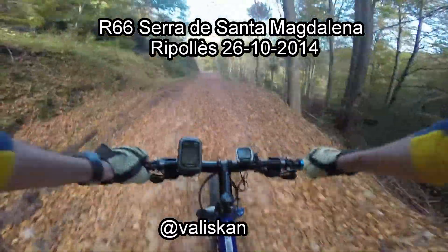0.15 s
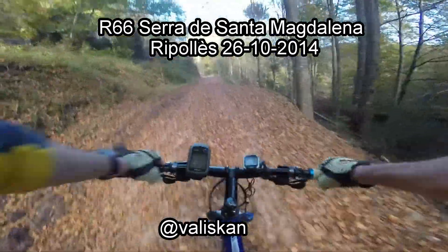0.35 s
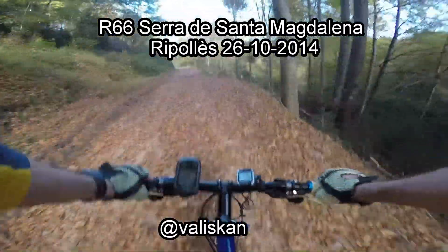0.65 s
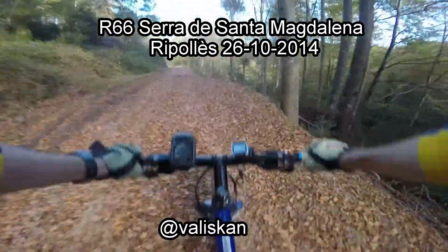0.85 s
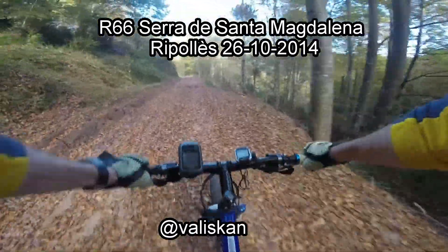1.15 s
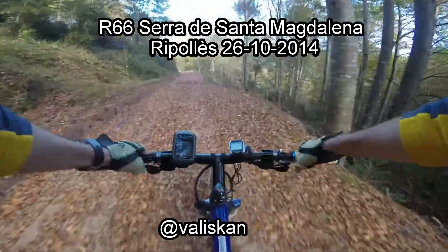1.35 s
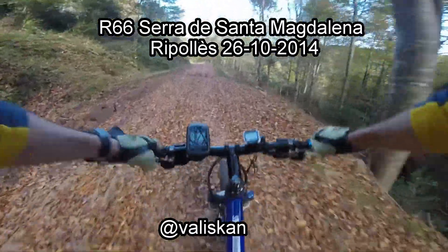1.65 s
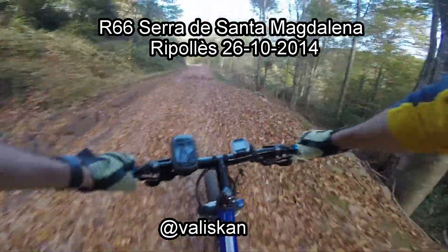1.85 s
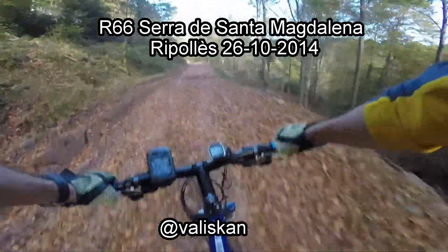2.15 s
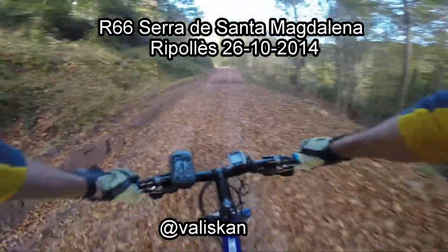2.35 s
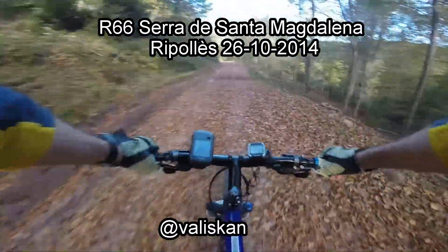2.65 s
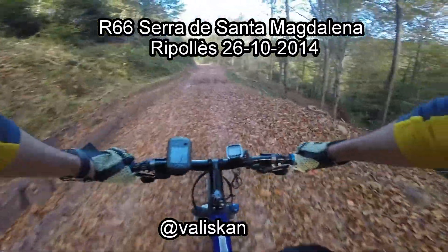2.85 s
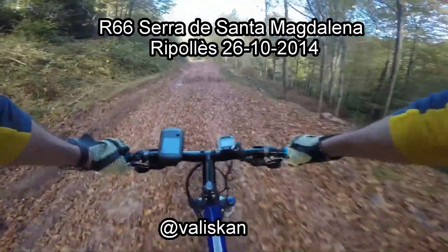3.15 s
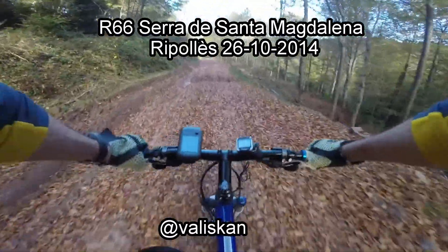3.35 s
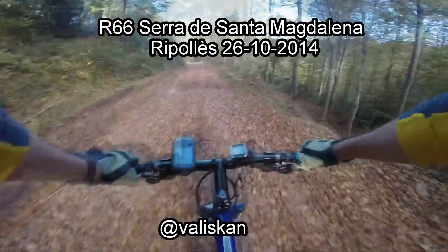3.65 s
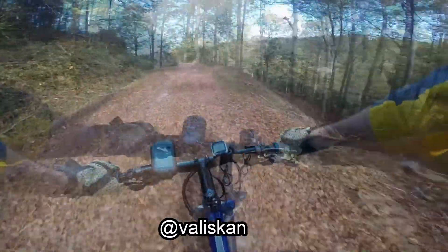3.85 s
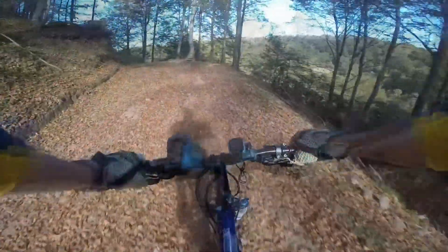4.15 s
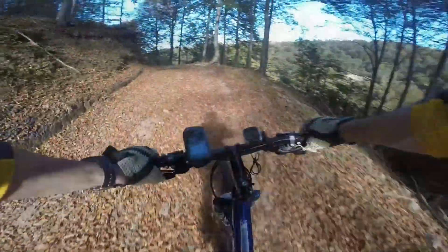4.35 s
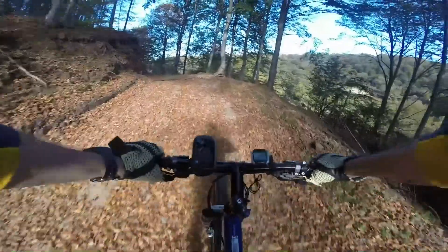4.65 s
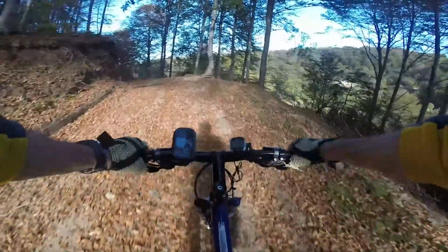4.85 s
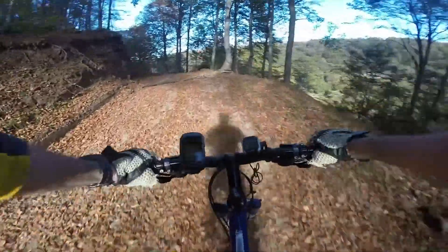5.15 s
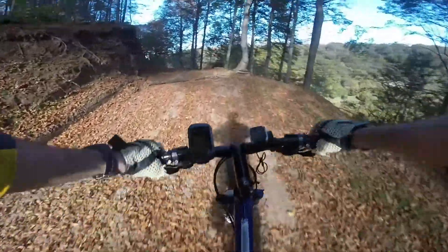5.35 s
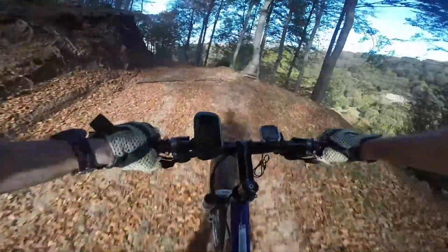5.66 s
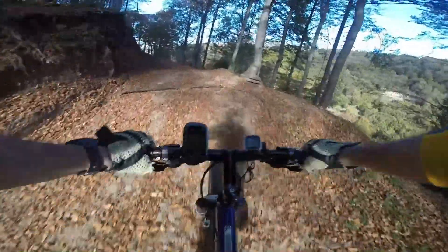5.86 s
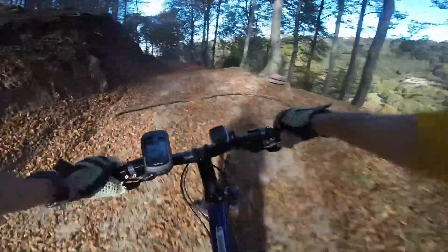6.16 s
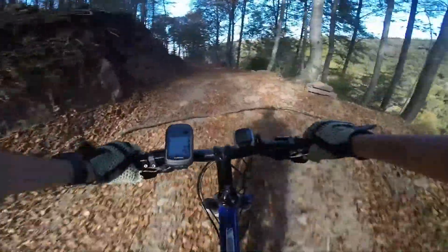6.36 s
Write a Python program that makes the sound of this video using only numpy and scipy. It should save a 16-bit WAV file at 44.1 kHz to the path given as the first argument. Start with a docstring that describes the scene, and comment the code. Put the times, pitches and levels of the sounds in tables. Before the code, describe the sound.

A mountain bike rolls along a forest dirt trail, heard from inside a camera's plastic case. A lumpy low rumble and fluttering wind run throughout, while bumps thud through the mount and the case knocks and rattles in uneven bursts. The hardest jolts come early. The ride briefly smooths out in the middle, then dry leaves crackle more clearly under the tyres as the clatter returns.

```python
"""Mountain bike on a forest trail

A bike rolls over dirt, stones and dry leaves, heard from inside a camera's plastic case. Bumps and
stones thud up through the mount, the case knocks and rattles, and wind and body sway heave it slowly.
Leaves crackle under the tyres. Knocks, rattle, crackle and a steady hiss are coloured by the
resonances of the case; a faint electronic whine lies behind them."""
import sys
import numpy as np
from scipy import signal
from scipy.fft import rfft, irfft
from scipy.io import wavfile
from scipy.ndimage import uniform_filter1d

SR = 44100
rng = np.random.default_rng(int(sys.argv[2]) if len(sys.argv) > 2 else 0)


def transcribe(signal):
    """Save signal, clipped to [-1, 1], as a 16-bit WAV file at the path in sys.argv[1]."""
    frames = np.atleast_2d(signal).T
    limited = np.clip(frames, -1, 1)
    pcm = np.round(limited * 32767).astype(np.int16)
    wavfile.write(sys.argv[1], SR, pcm)


N = 286209

# shaking of the bike between rough spots: t/s, rattle level/dB, rumble level/dB
TRAIL_LEVELS = [(0, -52, -41), (.35, -59, -53), (.9, -60, -43), (1.35, -58, -48), (1.7, -54.5, -47),
                (2.6, -63, -50), (3.0, -57, -48), (3.9, -63, -52.5), (4.3, -54.5, -46.5),
                (4.95, -56.5, -51.5), (5.35, -56, -49), (6.49, -55, -47)]
# rough spots that shake the bike: t/s of the peak, length/s, rattle level/dB, rumble level/dB
ROUGH_SPOTS = [(0.055, 0.093, -42, -34), (0.227, 0.046, -39, -39), (0.142, 0.034, -52, -37.5),
               (0.291, 0.048, -46, -42), (0.38, 0.033, -48, -39), (0.43, 0.058, -36.5, -29),
               (0.494, 0.062, -47.5, -35), (0.592, 0.055, -45.5, -41), (0.726, 0.11, -45.5, -39.5),
               (0.846, 0.056, -47, -33), (0.908, 0.065, -44.5, -34.5), (0.967, 0.048, -43, -34.5),
               (1.06, 0.042, -47, -39), (1.168, 0.12, -48, -45.5), (1.26, 0.088, -54, -41),
               (1.432, 0.011, -60, -29), (1.481, 0.01, -66, -33), (1.567, 0.047, -48, -43),
               (1.783, 0.026, -48, -38.5), (1.939, 0.039, -41.5, -42), (2.108, 0.073, -43, -46),
               (2.185, 0.041, -45.5, -42), (2.254, 0.057, -45, -43), (2.402, 0.08, -52, -47.5),
               (2.748, 0.073, -44.5, -39), (2.836, 0.033, -47, -53), (3.284, 0.13, -55.5, -48),
               (3.353, 0.037, -50, -55), (3.415, 0.022, -51, -61), (3.631, .04, -55.5, -49),
               (3.771, 0.023, -52, -63), (4.15, 0.14, -51, -50), (4.43, .06, -47, -36.5),
               (4.572, 0.05, -49, -56), (4.67, 0.091, -46.5, -41.5), (4.982, 0.042, -65, -44),
               (5.202, 0.044, -49, -67), (5.263, 0.088, -49.5, -54), (5.437, 0.02, -43, -42),
               (5.499, 0.012, -44, -41), (5.557, 0.04, -38.5, -33.5), (5.667, 0.074, -51.5, -46),
               (5.719, 0.039, -47, -36), (5.953, 0.039, -46, -38.5), (5.992, 0.027, -47.5, -53),
               (6.129, 0.056, -46.5, -42), (6.274, 0.055, -46.5, -38.5), (6.475, .06, -53, -40)]


def bumps():
    """Damped free vibration: each hard bump is one push that rings for a few low cycles."""
    # hard bumps: t/s, level/dB, f/Hz, time to decay by 60 dB/s
    impacts = [(0.03, -22, 123, 0.13), (0.238, -28.5, 130.4, 0.2), (0.409, -6, 119, 0.035),
               (0.428, -13.5, 186, 0.077), (0.687, -28, 117, 0.055), (1.036, -36.5, 152.5, 0.17),
               (1.262, -21, 111, 0.079), (1.421, -26, 81, 0.085), (1.465, -18.5, 96, 0.056),
               (1.8, -42, 83.4, 0.078), (1.901, -34, 216, 0.083), (2.086, -31, 125, 0.15),
               (2.255, -26.5, 144, 0.084), (2.372, -33.5, 123, 0.076), (2.415, -32.5, 99, 0.077),
               (2.72, -28.5, 121, 0.11), (4.422, -44, 126, 0.12), (4.555, -39, 111, 0.14),
               (4.65, -41.5, 163, 0.09), (5.543, -36, 81.5, 0.09), (5.7, -34, 118, 0.1),
               (5.925, -23, 81, 0.053)]
    out, t = np.zeros(N + SR), np.arange(SR // 2) / SR
    for start_s, level_db, hz, t60 in impacts:
        at = round(start_s * SR)
        ring = from_db(level_db - 60 * t / t60) * np.sin(2 * np.pi * hz * t)
        out[at:at + len(t)] += ring * np.tanh(t / 0.0026)   # soft onset
    return out[:N]


def knocks():
    """Impact excitation: a brief scraping contact with the mount drives five resonances of the case."""
    # knocks: t/s, level/dB, f/Hz, contact time/ms, relative body level/dB, relative snap level/dB
    contacts = [(0.0277, -41, 2370, 3.7, -18, 3), (.0613, -37, 2460, 1.1, -1, -6),
                (0.2126, -41, 2260, 7.3, -12, -4), (.2307, -36, 2370, 3.1, -7, -16),
                (0.406, -34, 2320, 2.8, 5.5, -30), (.4377, -22.5, 2300, 3.8, -34, -17),
                (.484, -30, 1990, 2.8, -24, -17), (.597, -37, 2300, 7.1, -13, -7),
                (0.7001, -21, 2280, 3.6, -14.5, 1.5), (.7332, -39.5, 2210, 4.4, -4, -2),
                (.815, -39, 1990, 4.2, -5, -15), (1.1303, -42.5, 2030, 3.1, -2.5, -3),
                (1.172, -29.5, 2090, 1.8, -18, -7), (1.181, -36, 1290, 2.2, -4, -9),
                (1.196, -41, 1890, 2.5, -25, -6), (1.4693, -37.5, 1850, 2.3, -13, -11),
                (1.5242, -45, 2270, 2.4, -17, 10.5), (1.594, -40, 2280, 3.5, -24, 0),
                (1.845, -30.5, 1220, 3.2, -37, -18), (1.9081, -42, 2040, 3.4, -1, -5),
                (2.0088, -37.5, 2060, 2.9, -5, -9), (2.0818, -28, 1460, 3.1, -12, -30),
                (2.1017, -30.5, 2250, 4.1, -11, -30), (2.1464, -34, 1560, 4, -30, -16),
                (2.172, -18, 1475, 4, -14, -1), (2.382, -41.5, 2400, 4.7, -3.5, -17),
                (2.7287, -40.5, 1520, 2.6, -6, -10), (3.1085, -39, 1680, 3.1, -11, -18),
                (3.1961, -39.5, 1970, 1.7, -6, -22), (3.276, -36, 1690, 1.8, -25, -12),
                (4.2817, -38.5, 2330, 3, -30, -12), (4.554, -33, 1800, 2.3, -15, -17),
                (4.6556, -38.5, 2350, 3, -4, -18), (5.1898, -35.5, 2420, 3, -22, -18),
                (5.44, -41, 2270, 3, -23, -9), (5.4978, -36.5, 2130, 2.3, -9, -9),
                (5.53, -37, 1290, 2, -25, -5), (5.55, -31, 2330, 4.2, -28, -16),
                (5.6226, -40.5, 2190, 2.8, -5.5, -20), (5.713, -39.5, 2260, 1.9, -19, 0),
                (5.9356, -35, 2160, 4.5, -10, -16), (6.1055, -39, 2220, 3.8, -10, -5),
                (6.257, -46, 2360, 3.3, -4, 9), (6.2774, -36.5, 1980, 3.5, -6, -3),
                (6.373, -42.5, 2260, 2.5, -26, 1), (6.4567, -42.5, 2320, 3.3, -10, -9)]
    out, t = np.zeros(N + SR), np.arange(2048) / SR
    for start_s, level_db, hz, contact_ms, body_db, snap_db in contacts:
        at = round(start_s * SR)
        force = rng.standard_normal(len(t)) + 3.7 * (t == 0)   # scrape plus impulse
        force *= np.exp(-(1000 * t / contact_ms) ** 1.37)
        # f/Hz, relative level/dB, bandwidth/Hz
        modes = [(hz, 0, 380),                            # main ring
                 (5260, -26.5, 200),                      # faint metal jingle
                 (650, body_db, 250),                     # low body
                 (1900, snap_db, 1500),                   # wide snap
                 (hz + 1470, -3 + 0.74 * snap_db, 500)]   # bright ring that grows with the snap
        for mode_hz, mode_db, width_hz in modes:
            ring = resonance(force, mode_hz, width_hz)
            ring = through_case(resonance(ring, mode_hz, 0.96 * width_hz))
            out[at:at + len(t)] += from_db(level_db + mode_db) * ring / abs(ring).max()
    return out[:N]


def sway():
    """Low-frequency forcing: wind and the rider's chest heave the case in a mostly subsonic flutter."""
    # strength of the heave: t/s, level/dB
    heave_levels = [(0.0, -38), (0.05, -24), (0.72, -30.5), (0.76, -21.5), (0.96, -46), (1.12, -25),
                    (1.16, -37), (1.9, -29.5), (2.06, -34), (2.19, -20.5), (2.26, -34.5), (3.98, -37),
                    (4.03, -32), (4.7, -35), (4.81, -30.5), (5.49, -34.5), (5.51, -31.5), (6.18, -28.5),
                    (6.2, -34.5), (6.49, -28.5)]
    # spectrum of the heave: f/Hz, level/dB
    spectrum = [(4, -8), (10, -3), (22, -1.5), (34, -14.5), (55, -22.5), (100, -35), (300, -79.5)]
    level_db, = in_time(heave_levels)
    heave = colour(rng.standard_normal(N), spectrum)
    return from_db(level_db) * evened(heave, span_s=0.3)


def stone_rumble(trail_db):
    """Structure-borne sound: jolts from small stones travel up the frame as a lumpy rumble."""
    # spectrum of the rumble: f/Hz, level/dB
    spectrum = [(25, -42.5), (55, -2), (110, 0.5), (200, -5.5), (280, -15.5), (450, -24), (800, -29),
                (3000, -76.5)]
    peaks_db = np.array(ROUGH_SPOTS)[:, 3]
    level_db = with_shakes(trail_db, peaks_db, flicker_db=3.5)
    jolts = grains(per_s=400, spread_db=4, clump_db=1.5, clump_hz=17)
    return from_db(level_db) * evened(colour(jolts, spectrum), span_s=0.0482)


def rattle(trail_db):
    """Intermittent contact: the loose case chatters in its mount in bursts of tiny impacts."""
    # spectrum of the chatter ahead of the case resonances: f/Hz, level/dB
    spectrum = [(150, -17), (400, 2), (700, -6.5), (1000, -10), (1400, -2), (2400, 1), (3000, -8.5),
                (4200, -12), (6000, -20.5), (12000, -69)]
    peaks_db = np.array(ROUGH_SPOTS)[:, 2]
    level_db = with_shakes(trail_db, peaks_db, flicker_db=2.44)
    ticks = grains(per_s=2500, spread_db=2, clump_db=2.5, clump_hz=48)
    chatter = through_case(colour(ticks, spectrum))
    return from_db(level_db) * evened(chatter, span_s=0.066)


def leaves():
    """Brittle fracture: dry leaves snap under the tyres, coarse and fine bits in clumps of their own."""
    # strength of the crackle: t/s, level/dB
    crackle_levels = [(0, -60.5), (.35, -62), (.75, -57), (1.35, -57.5), (1.65, -57.5), (2.05, -62),
                      (2.35, -60.5), (3.45, -65), (3.7, -56), (3.95, -57.5), (4.2, -49), (4.26, -53.5),
                      (4.32, -49.5), (4.6, -48.5), (4.85, -52), (5.07, -55.5), (5.22, -51), (5.55, -53.5),
                      (5.75, -53.5), (5.83, -53.5), (5.92, -55), (6.15, -57), (6.25, -45.5), (6.38, -51.5),
                      (6.49, -52)]
    # bands of the fragments, coarse to fine: lower f/Hz, upper f/Hz
    bands = [(400, 3000), (3000, 5300), (5300, 8200), (8200, 11000), (11000, 17000)]
    # spectral weighting ahead of the case resonances: f/Hz, level/dB
    spectrum = [(500, -27), (1200, -14), (3000, -3.5), (5500, -1), (8000, -5), (10500, -15.5), (12000, -17),
                (15000, -24.5)]
    steady_db, = in_time(crackle_levels)
    peaks_db = np.array(ROUGH_SPOTS)[:, 2] - 21   # a shake adds crackle 21 dB below its rattle
    level_db = with_shakes(steady_db, peaks_db, flicker_db=2)
    common_gain = from_db(1.1 * drift(30))
    fragments = np.zeros(N)
    for band_hz in bands:
        snaps = grains(per_s=7100, spread_db=3.5, clump_db=2, clump_hz=64)
        fragments += signal.sosfilt(signal.butter(2, band_hz, "band", fs=SR, output="sos"), snaps)
    crackle = through_case(colour(common_gain * fragments, spectrum))
    return from_db(level_db) * evened(crackle, span_s=0.092)


def electronics():
    """Electronic self-noise: steady hiss and a thin harmonic whine with slight phase jitter."""
    # partials of the whine: harmonic number, rms level/dB
    harmonics = [(3, -89), (4, -79.5), (5, -97)]
    # spectrum of the hiss ahead of the case resonances: f/Hz, level/dB
    spectrum = [(200, -6.5), (1000, -7), (4000, -14), (8000, -19.5), (10800, -28), (11700, -16.5),
                (12900, -44), (13350, -22), (14100, -33), (14700, -35), (15200, -40)]
    fundamental_hz, hiss_db = 2929.7, -59
    phase = 2 * np.pi * fundamental_hz * np.arange(N) / SR + 0.07 * drift(20) + 0.12 * drift(150)
    whine = sum(np.sqrt(2) * from_db(db) * np.sin(k * phase) for k, db in harmonics)
    hiss = through_case(colour(rng.standard_normal(N), spectrum))
    return whine + from_db(hiss_db) * rms_one(hiss)


def through_case(x):
    """Resonance and antiresonance: the case lifts some bands and lowers others."""
    # peaks and dips of the case: f/Hz, bandwidth/Hz, gain/dB
    modes = [(561.4, 65, 7.5), (689, 24, 6), (1020, 340, -1.5), (1220, 102, 3.5), (1520, 320, 4),
             (2280, 200, 6.5), (2814, 580, 3), (3080, 420, 0), (3730, 85, 5.5), (4890, 440, 4.5),
             (5040, 360, -11), (6170, 88, 6.5), (7560, 400, 1.5), (8030, 420, -5), (8100, 240, -3.5)]
    for hz, width_hz, gain_db in modes:
        x = x + (from_db(gain_db) - 1) * resonance(x, hz, width_hz)
    return x


def with_shakes(steady_db, peaks_db, flicker_db):
    """Addition of powers: rough spots swell a level that flickers with the uneven ground; gives dB."""
    rise_share, fall_share = 0.27, 0.38   # Gaussian widths, as shares of a spot's length
    t = np.arange(N) / SR
    power = from_db(steady_db + flicker_db * drift(8.4)) ** 2
    for (peak_s, length_s, *_), peak_db in zip(ROUGH_SPOTS, peaks_db):
        near = slice(max(0, int((peak_s - 2 * length_s) * SR)), int((peak_s + 2 * length_s) * SR))
        side_s = length_s * np.where(t[near] < peak_s, rise_share, fall_share)
        power[near] += from_db(peak_db) ** 2 * np.exp(-((t[near] - peak_s) / side_s) ** 2)
    return 10 * np.log10(power)


def grains(per_s, spread_db, clump_db, clump_hz):
    """Shot noise: random clicks of uneven size, clumped by a wandering gain."""
    sizes = from_db(spread_db * np.minimum(rng.exponential(1, N), 5))
    signs = rng.choice([-1, 1], N)
    clumping = from_db(clump_db * drift(clump_hz))
    return sizes * signs * clumping * (rng.random(N) < per_s / SR)


def resonance(x, hz, width_hz):
    """Damped oscillator: a two-pole band-pass with unit gain at its peak."""
    r = np.exp(-np.pi * width_hz / SR)
    numerator = np.array([1, 0, -1]) * (1 - r * r) / 2
    return signal.lfilter(numerator, [1, -2 * r * np.cos(2 * np.pi * hz / SR), r * r], x + 1e-18)


def colour(x, spectrum):
    """Minimum-phase filtering: a causal response follows a spectrum of f/Hz, level/dB."""
    size = 2 ** 19
    hz, db = np.transpose(spectrum)
    bin_hz = np.arange(size // 2 + 1) * SR / size
    log_gain = np.interp(np.log(bin_hz + 1), np.log(hz), db) * np.log(10) / 20
    cepstrum = irfft(log_gain)
    cepstrum[1:size // 2] *= 2   # fold onto positive time
    cepstrum[size // 2 + 1:] = 0
    return irfft(rfft(x, size) * np.exp(rfft(cepstrum)))[:N]


def drift(corner_hz):
    """Correlated noise: white noise twice through a one-pole low-pass, at unit rms."""
    r = np.exp(-2 * np.pi * corner_hz / SR)
    return rms_one(signal.lfilter([1], [1, -2 * r, r * r], rng.standard_normal(N + SR))[SR:])


def evened(x, span_s):
    """Envelope normalisation: dividing by the running rms, with a floor, evens out slow swings."""
    running_power = uniform_filter1d(x ** 2, int(span_s * SR))
    return x / np.sqrt(running_power + 0.076 * np.mean(x ** 2))


def in_time(rows):
    """Linear interpolation: each column that follows t/s, at every sample."""
    times, *columns = np.transpose(rows)
    return [np.interp(np.arange(N) / SR, times, column) for column in columns]


def rms_one(x):
    """Normalisation to unit rms."""
    return x / np.sqrt(np.mean(x ** 2) + 1e-20)


def from_db(db):
    """Amplitude ratio of a level in decibels."""
    return 10 ** (np.asarray(db) / 20)


def scene():
    """Superposition: all sources add at the microphone inside the case."""
    rattle_db, rumble_db = in_time(TRAIL_LEVELS)
    low = sway() + stone_rumble(rumble_db) + bumps()
    clatter = rattle(rattle_db) + knocks()
    return (low + clatter + leaves() + electronics())[None]


def record(dry):
    """Band limiting: an elliptic low-pass cuts the top treble steeply."""
    cutoff_hz = 15280
    return signal.sosfilt(signal.ellip(12, 0.5, 60, cutoff_hz, fs=SR, output="sos"), dry)


dry = scene()
out = record(dry)
transcribe(out)
```